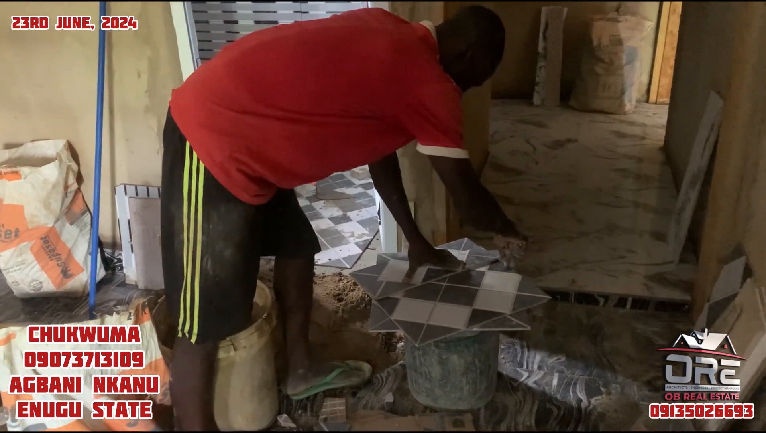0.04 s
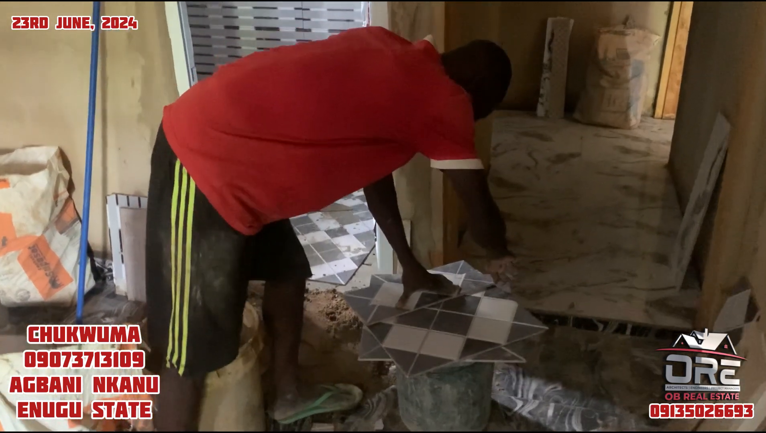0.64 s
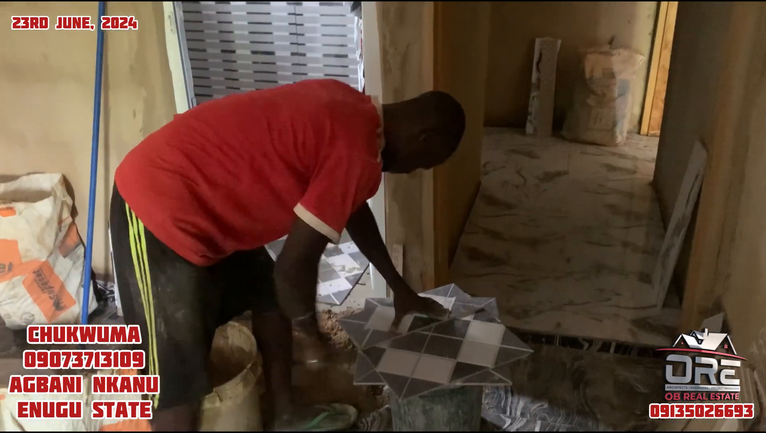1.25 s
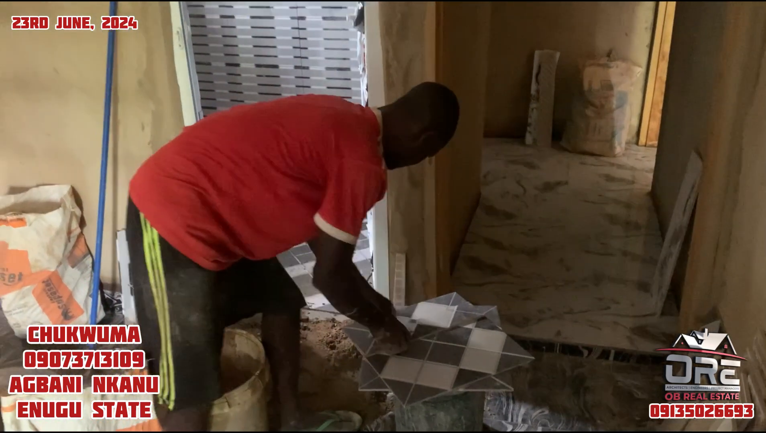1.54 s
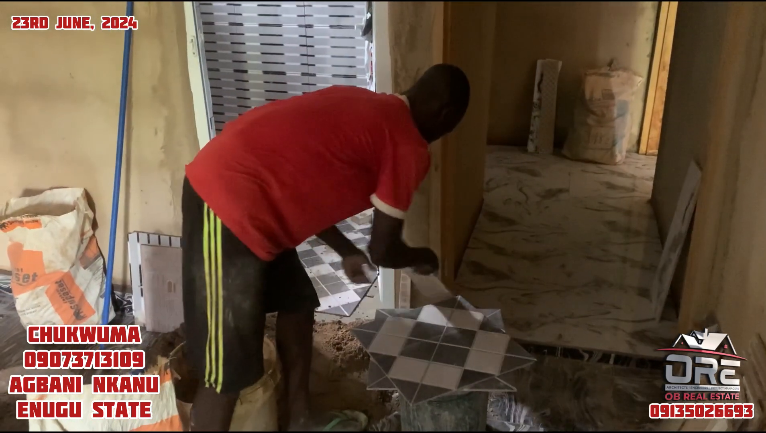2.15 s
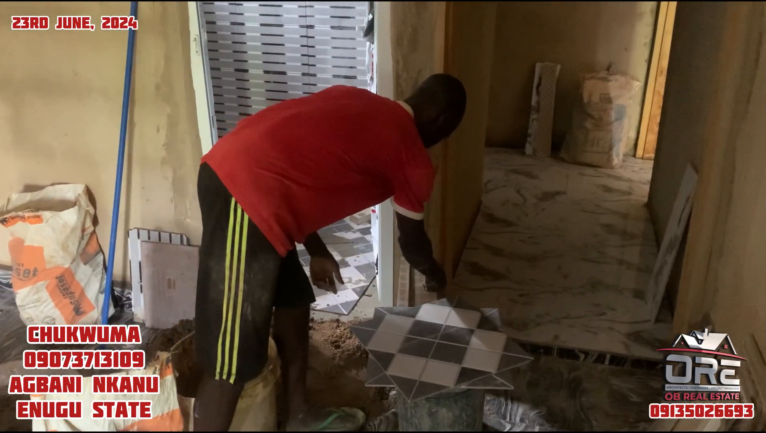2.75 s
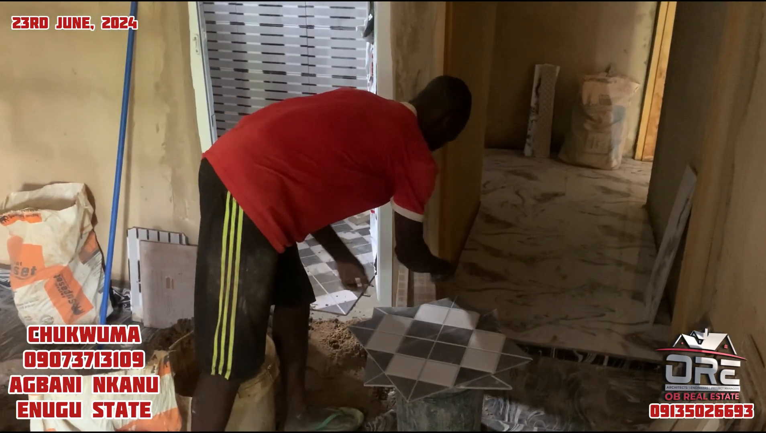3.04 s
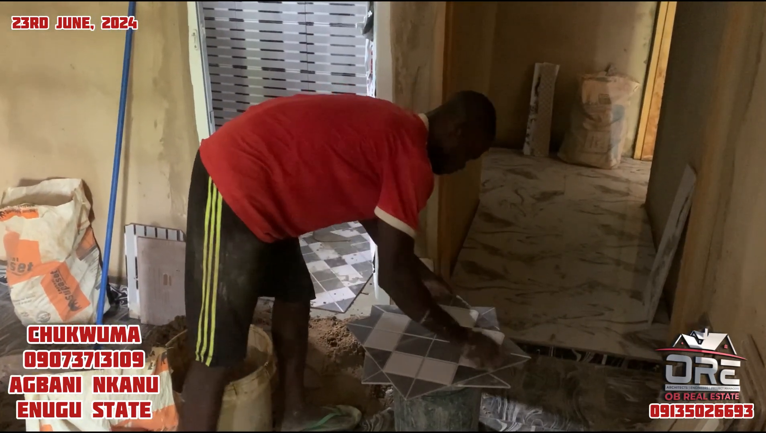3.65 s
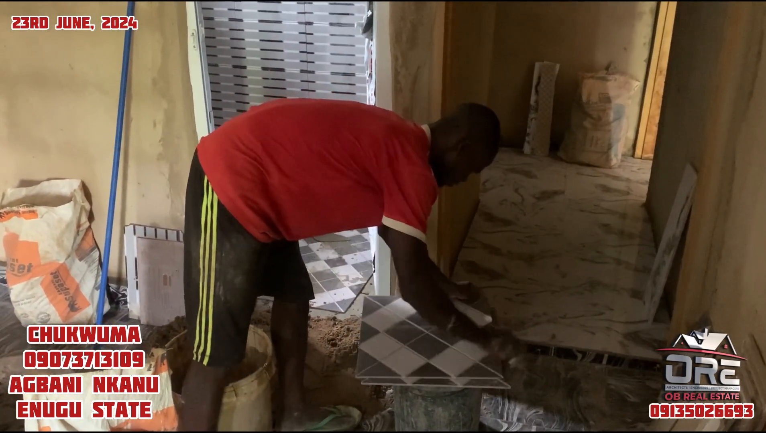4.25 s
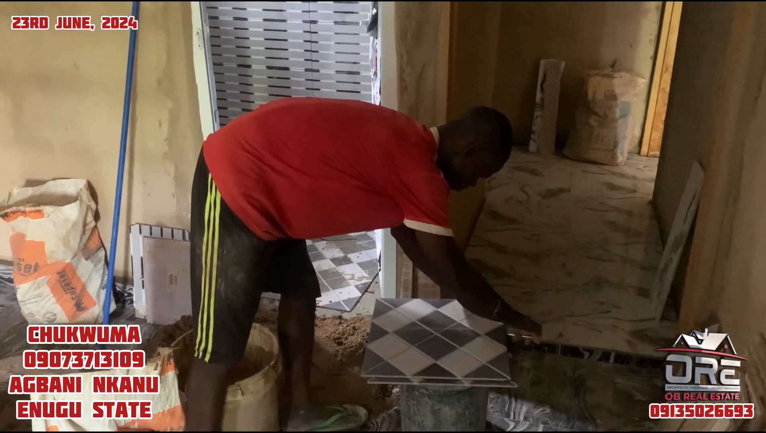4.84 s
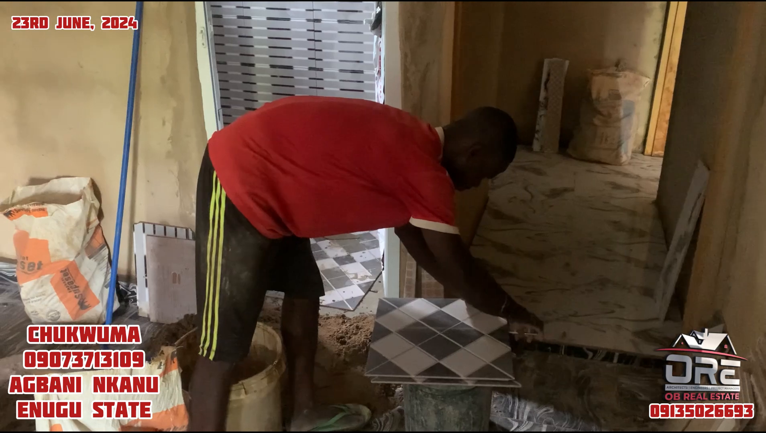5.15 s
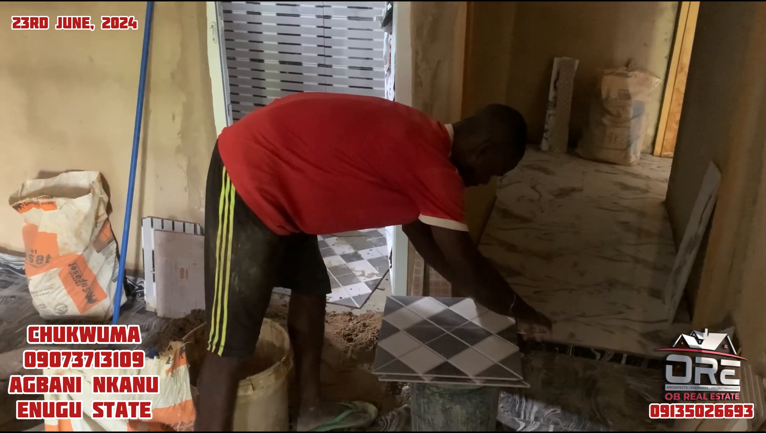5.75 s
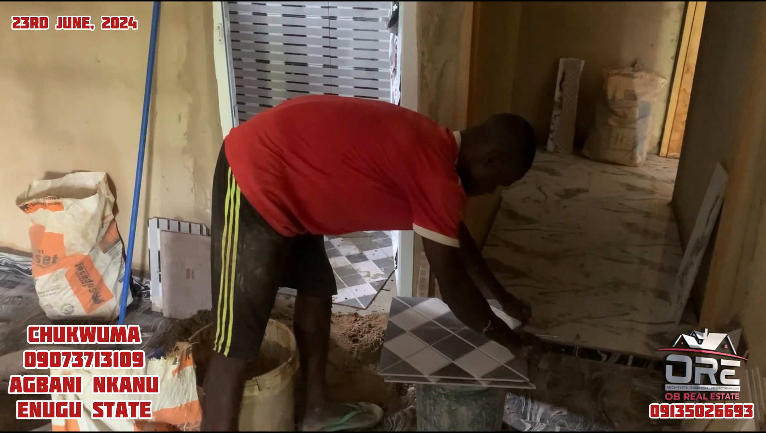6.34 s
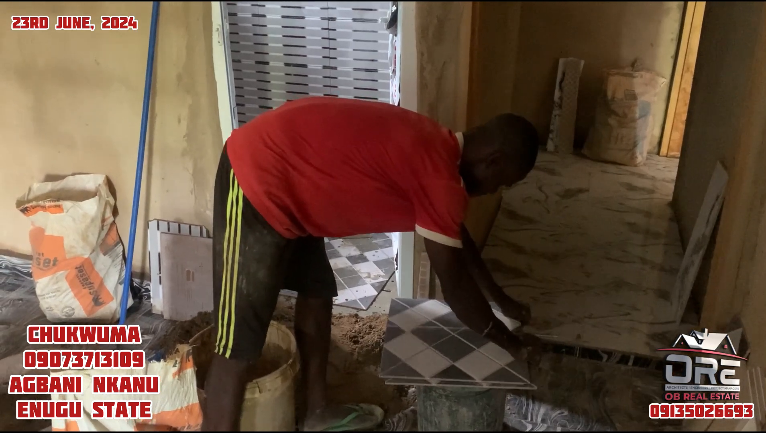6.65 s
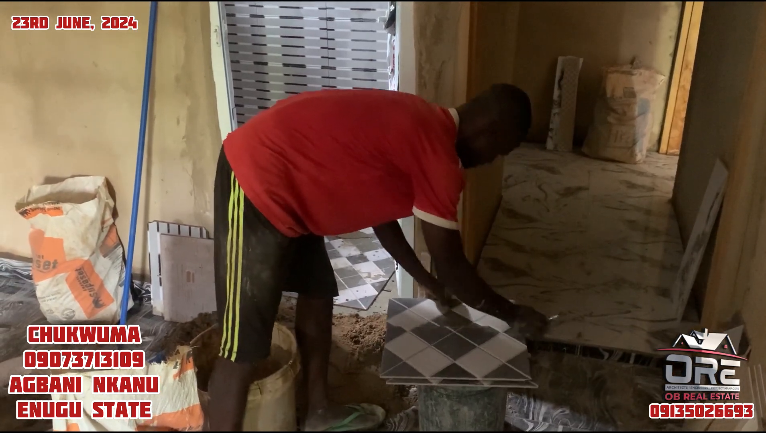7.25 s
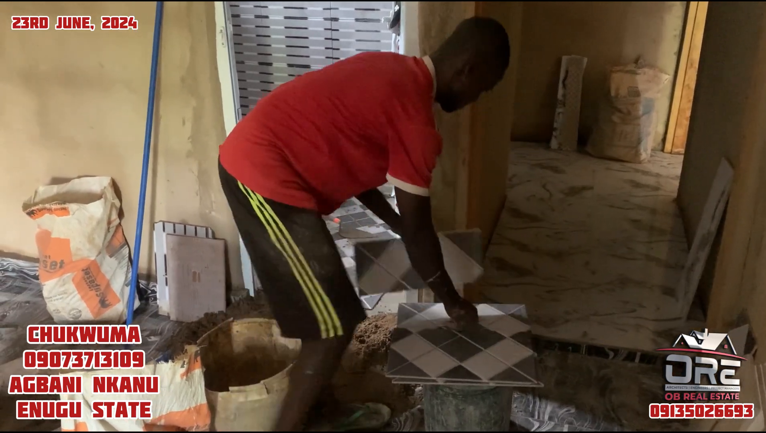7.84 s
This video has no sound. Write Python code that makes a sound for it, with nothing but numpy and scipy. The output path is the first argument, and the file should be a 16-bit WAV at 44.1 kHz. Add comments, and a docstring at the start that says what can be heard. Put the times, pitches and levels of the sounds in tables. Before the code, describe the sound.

Close to the microphone in a bare, echoing house, a steel trowel crunches into mortar and gives a sharp, gritty screech. Short scrapes and ringing blade taps follow, then more scraping and a run of crunchy knocks. Two hard thumps hit the slab, a ceramic tile slides briefly, and steel clinks on tile. Further off, plaster is rubbed in long strokes over a low outdoor rumble.

```python
"""In a bare, echoing house a tiler works mortar with a steel trowel. Sliding friction makes the blade
scrape through grit, and stick-slip makes it screech. Impacts crunch the mortar, thump the slab and
excite the free vibration of the blade and of a ceramic tile. Further off, plaster is rubbed in long
strokes over a low outdoor rumble. One short peep is heard. A phone close by limits the hardest blows."""
import sys
import numpy as np
from scipy import signal
from scipy.fft import rfft, irfft, next_fast_len
from scipy.io import wavfile
from scipy.ndimage import uniform_filter1d, map_coordinates

SR = 44100
rng = np.random.default_rng(int(sys.argv[2]) if len(sys.argv) > 2 else 0)


def transcribe(u):
    """Save the signal u as a 16-bit wav file named by the first command-line argument.

    u: samples, shape (n,) or (channels, n), limited to [-1, 1]; the rate is SR.
    q: integer samples, one column per channel.
    """
    v = np.clip(np.atleast_2d(u).T, -1, 1)
    q = np.round(v * 32767).astype(np.int16)
    wavfile.write(sys.argv[1], SR, q)


N = 353241
T = np.arange(N) / SR


def undb(db):
    """Decibels to amplitude ratio."""
    return 10 ** (np.asarray(db) / 20)


def unit(x):
    """Normalisation to rms 1."""
    return x / np.sqrt(np.mean(x ** 2))


def blow_level(x, db):
    """Equal energy: a transient gets the energy of 50 ms at this level."""
    return x * undb(db) * np.sqrt(SR / 20 / np.sum(x ** 2))


def on_log(hz, points):
    """Interpolation of (Hz, value) points over log frequency."""
    f, value = np.transpose(points)
    return np.interp(np.log(np.maximum(hz, 1)), np.log(f), value)


def colour(x, points, tilt_db=0):
    """Minimum-phase filtering by a spectrum, tilted per octave about 2 kHz."""
    size = 4096
    hz = np.arange(size // 2 + 1) * SR / size
    db = on_log(hz, points) + tilt_db * np.log2(np.maximum(hz, 500) / 2000)
    cepstrum = irfft(np.log(undb(db)))
    cepstrum[1:size // 2] *= 2
    cepstrum[size // 2 + 1:] = 0
    return signal.fftconvolve(x, irfft(np.exp(rfft(cepstrum))))[:len(x)]


def resonate(x, hz, width_hz):
    """Forced resonance: two like resonators in series, output at rms 1."""
    peak = signal.iirpeak(hz, hz / width_hz, fs=SR)
    return unit(signal.lfilter(*peak, signal.lfilter(*peak, x)))


def walk(rate, size):
    """Smooth random modulation with a spread near 1."""
    hold = int(SR / rate)
    held = np.repeat(rng.standard_normal(size // hold + 1), hold)
    return unit(uniform_filter1d(held, hold))[:size]


def grains(size, spread_db):
    """Granular noise: dense clicks, a few far above the rest."""
    return unit(rng.standard_normal(size) * undb(spread_db * np.minimum(rng.exponential(size=size), 6)))


def fade(t, t60):
    """Exponential decay, 60 dB in t60 seconds."""
    return np.exp(-np.log(1000) * t / max(t60, 1 / SR))


def burst(t60, rise_s):
    """Impact noise of the grains crushed by one blow."""
    t = T[:SR // 2]
    return grains(len(t), 1.8) * fade(t, t60) * (1 - fade(t, 2 * rise_s))


def ring(modes, split=0.0107, twin_db=-4, rattle=0.75, rattle_rate=350, size=SR):
    """Free vibration: each mode is a beating pair, roughened by loose grit."""
    t = T[:size]
    out = 0
    for hz, t60, db in modes:
        phase, twin_phase, detune = rng.uniform(-0.61, 1, 3)
        twin = undb(twin_db) * np.sin(2 * np.pi * (hz * (1 + split * detune) * t + twin_phase))
        jitter = rattle * walk(rattle_rate, len(t))
        out = out + undb(db) * fade(t, t60) * (np.sin(2 * np.pi * (hz * t + phase) + jitter) + twin)
    return out


def gesture(length_s, attack_s, release_t60, swell_db=0):
    """Time axis and amplitude envelope: attack, sloping hold, release."""
    t = T[:int((length_s + release_t60) * SR)]
    hold = undb(swell_db * (np.minimum(t / length_s, 1) - .5))
    return t, np.minimum(t / attack_s, 1) * hold * fade(np.maximum(t - length_s, 0), release_t60)


def add(track, s, x):
    """Superposition of a sound starting at time s, which may be negative."""
    start = int(s * SR)
    x, start = x[max(-start, 0):], max(start, 0)
    track[start:start + len(x)] += x[:N - start]


def flaring(events, modes, flutter_db, attack_s, release_t60, climb_db=0):
    """Noise-driven resonances flare at random; climb_db per octave favours high ones toward the end."""
    out = np.zeros(N)
    for s, length, db, swell_db in events:
        t, force = gesture(length, attack_s, release_t60, swell_db)
        drive = grains(SR, 2.5)
        tilt_db = climb_db * (np.minimum(t / length, 1) - .5)
        cry = 0
        for hz, width, mode_db in modes:
            flare = undb(mode_db + flutter_db * walk(74.9, SR)) * resonate(drive, hz, 2 * width)
            cry = cry + flare[-len(t):] * undb(tilt_db * np.log2(hz / 2000))
        add(out, s - length / 2, unit(cry) * force * undb(db))
    return out


# Likeness of left and right. Each row: frequency in Hz, coherence from 0 to 1.
COHERENCE = [(60, 1), (150, 0.92), (300, 0.62), (600, 0.42), (1200, 0), (15000, 0.07)]

def spread(pair):
    """Diffuse field: two unrelated signals become left and right, coherent in the bass."""
    size = pair.shape[1]
    padded = next_fast_len(size)
    alike = np.clip(on_log(np.arange(padded // 2 + 1) * SR / padded, COHERENCE), -1, 1)
    mid, side = rfft(pair, padded) * np.sqrt([(1 + alike) / 2, (1 - alike) / 2])
    return irfft(np.array([mid + side, mid - side]), padded)[:, :size]


# Outdoor noise. Each row: frequency in Hz, level in dB.
RUMBLE_SPECTRUM = [(20, -30.5), (45, -22.5), (62, 1), (95, 5.5), (140, 2.5), (270, -5), (420, 14.5),
                   (800, -4.5), (2500, 0.5), (6000, -65), (14000, -101)]

def outdoors(rumble_db=-46, drone_hz=61, drone_db=-50, overtone_db=-54):
    """Ambient noise: a low rumble and two wavering harmonics of a far engine."""
    rumble = spread(np.array([unit(colour(rng.standard_normal(N), RUMBLE_SPECTRUM)) for _ in range(2)]))
    phase = 2 * np.pi * np.cumsum(drone_hz * (1 + 0.0217 * walk(1.7, N))) / SR
    drone = undb(drone_db) * unit(np.sin(phase)) + undb(overtone_db) * unit(np.sin(2 * phase))
    return undb(rumble_db) * rumble + drone


# Strokes of the float. Each row: middle and length in seconds, rub and hiss levels in dB.
FLOAT_STROKES = [(0.055, 0.37, -30.5, -47), (0.383, 0.2, -30.5, -43), (1.213, 0.26, -27, -32),
                 (1.94, 0.69, -28, -36.5), (2.735, 0.28, -28, -44), (3.058, 0.25, -28, -38),
                 (3.31, 0.24, -28.5, -38), (4.093, 0.68, -28.5, -36.5), (4.861, 0.76, -25.5, -38),
                 (5.486, 0.43, -30, -42.5), (5.91, 0.45, -29, -34.5), (6.467, 0.26, -31, -38),
                 (6.99, 0.94, -27.5, -37), (7.59, 0.6, -30.5, -42)]
# The float catching. Each row: middle and length in seconds, level in dB.
FLOAT_RASPS = [(0.14, 0.58, -37.5), (1.297, 0.25, -29.5), (1.681, 0.071, -30), (1.716, 0.012, -20),
               (1.8, 0.094, -32), (2.267, 0.17, -26.5), (5.95, 0.39, -35), (7.046, 0.29, -30)]
# Rubbed plaster and its dry patches. Each row: frequency in Hz, level in dB.
RUB_SPECTRUM = [(30, -37.5), (70, -8), (135, 0.5), (210, -9.5), (270, 3), (400, -3.5), (750, -4.5),
                (1400, -3.5), (2500, -2.5), (4000, -13), (6000, -28.5), (9000, -58.5)]
HISS_SPECTRUM = [(1500, -11), (3200, 10), (4500, 6), (6800, -3.5), (8500, -26), (11500, -34),
                 (14000, -59.5)]

def plastering(grit_db=0.75, uneven_db=1.65, chatter_db=1.0, float_hz=1920, float_width_hz=290):
    """Friction noise, arriving diffusely: dry patches hiss and the float chatters in one resonance."""
    rub_power, hiss_power, rasp_power = np.zeros((3, N))
    for s, length, db, hiss_db in FLOAT_STROKES:
        _, speed = gesture(length, attack_s=0.11, release_t60=1)
        rasp_db = db - 13  # every stroke rasps a little
        for power, peak_db in (rub_power, db), (hiss_power, hiss_db), (rasp_power, rasp_db):
            add(power, s - length / 2, (speed * undb(peak_db)) ** 2)
    for s, length, db in FLOAT_RASPS:
        _, grip = gesture(length, attack_s=0.0055, release_t60=0.34)
        add(rasp_power, s - length / 2, (grip * undb(db)) ** 2)
    rub, hiss = (spread(np.array([unit(colour(grains(N, grit_db), tone)) for _ in range(2)]))
                 for tone in (RUB_SPECTRUM, HISS_SPECTRUM))
    rasp = np.array([resonate(grains(N, 0.54), float_hz, float_width_hz) for _ in range(2)])
    pressure = undb(uneven_db * walk(25, N))
    chatter = undb(chatter_db * walk(70, N))
    rubbing = rub * np.sqrt(rub_power) + hiss * np.sqrt(hiss_power)
    return pressure * rubbing + chatter * rasp * np.sqrt(rasp_power)


# The steel blade. Each row: frequency in Hz, t60 in seconds, levels in dB struck at heel and at tip.
BLADE_MODES = [(1086, .15, -19.5, -1), (1510, 0.45, -18.5, 2.5), (2235, 0.18, 3, -6.5),
               (2310, .18, -5, -17), (3125, 0.11, 1.5, 4.5), (3084, .14, -3.5, 3), (3450, 0.12, -6.5, -4),
               (3830, .12, -15.5, -2.5), (3888, .2, -15, 3.5), (4090, 0.13, 2, -1.5),
               (4370, 0.28, 3.5, -10.5), (4860, 0.16, -2, -5), (5420, 0.11, 2, -18), (5540, .22, -16, -18),
               (5862, 0.18, -17, -28), (5930, 0.13, 2, -22), (6400, 0.13, -4.5, -18.5),
               (6480, 0.48, -16, -17.5), (6920, 0.28, -7, -14), (7080, 0.27, -5.5, -20),
               (7910, 0.23, -9, -17.5), (10000, 0.14, -4.5, -21.5), (10050, .1, -9, -22),
               (10800, 0.15, -17, -28.5)]

def blade_modes(place, t60_share=1):
    """Mode shapes: the point of contact (0 heel, 1 tip) decides which modes speak."""
    return [(hz, t60 * t60_share, heel + place * (tip - heel)) for hz, t60, heel, tip in BLADE_MODES]


def flexed(x, depth=0.018, rate=30):
    """Frequency modulation: a pressed blade flexes, so its resonances wander together."""
    position = np.cumsum(1 + depth * walk(rate, SR))[:len(x)]
    return map_coordinates(x, [position], mode="mirror")


# Trowel strokes. Each row: middle and length in seconds, level and swell in dB,
# brightness in dB per octave, blade ring in dB, share of the length spent biting in.
TROWEL_STROKES = [(0.469, 0.14, -39.5, -7.5, -1.5, -0.5, 0.13), (0.85, 0.18, -12, -8.5, 2, -8, .3),
                  (1.687, 0.12, -36, -19, -1.5, -10, 0.22), (1.81, 0.098, -23.5, -4, -3.5, -2, 0.086),
                  (1.909, 0.12, -24.5, 6, -0.5, -3, 0.092), (3.93, 0.33, -24.5, 14, -0.5, -8.5, 0.12),
                  (4.131, 0.13, -16.5, 0, -3, -18, 0.39), (4.739, 0.35, -41, -12, -7, 5, 0.098),
                  (6.673, 0.12, -14, -4, -8, -26, 0.48), (7.324, 0.081, -16, -5.5, -2.5, -6.5, 0.17),
                  (7.593, .14, -21.5, 4, -2.5, -6, 0.55)]
# Scraped sand. Each row: frequency in Hz, level in dB.
GRIT_SPECTRUM = [(60, -24), (120, -2.5), (300, -8), (550, -5), (1200, -1), (2200, 2.5), (4200, -3.5),
                 (6800, -7), (8500, -25.5), (10000, -13.5), (12000, -16.5), (13100, -44), (16000, -51)]

def scrapes(grit_db=4.0, judder_db=3.3, judder_rate=70, pebble_rate=70, pebble_db=-7, contact_s=.003):
    """Forced vibration: dragged in small jerks, sand and pebbles drive the mortar-damped steel."""
    out = np.zeros(N)
    for s, length, db, swell_db, brightness, ring_db, bite in TROWEL_STROKES:
        steel = ring(blade_modes(place=rng.uniform(0, 1), t60_share=0.12), size=SR // 8)
        steel *= 1 - fade(T[:len(steel)], contact_s)
        t, force = gesture(length, bite * length, release_t60=0.16, swell_db=swell_db)
        pebbles = unit((rng.random(SR) < pebble_rate / SR) * rng.uniform(.5, 1, SR)) * undb(pebble_db)
        sand = (grains(SR, grit_db) * undb(judder_db * walk(judder_rate, SR)) + pebbles)[:len(t)]
        dull, sharp = (unit(colour(sand, GRIT_SPECTRUM, tilt)) for tilt in (-3, 3))
        tilt_db = brightness - 0.5 * (t / length - .5)  # duller as the blade sinks in
        sharpness = np.clip(tilt_db / 6 + .5, 0, 1)
        grit = unit((1 - sharpness) * dull + sharpness * sharp)
        blade = unit(flexed(signal.fftconvolve(sand, steel)[:len(t)])) * undb(ring_db)
        add(out, s - length / 2, (grit + blade) * force * undb(db))
    return out


# Blows into mortar. Each row: start in seconds, crunch in dB, t60 in seconds, cutoff in Hz, thud in dB.
MORTAR_BLOWS = [(.412, -39, 0.034, 14000, -69), (0.584, -36, 0.017, 10000, -60),
                (0.638, -29, 0.015, 8300, -58), (0.719, -24, 0.03, 5500, -31),
                (0.774, -15, 0.023, 4880, -23), (2.078, -28.5, 0.015, 2500, -58.5),
                (3.744, -39, 0.025, 4580, -38), (4.19, -24.5, 0.12, 1520, -34),
                (4.604, -26.5, 0.041, 5050, -45), (4.661, -17, 0.047, 3540, -28),
                (4.757, -22, 0.03, 4300, -24.5), (4.826, -16.5, 0.045, 4160, -23.5),
                (5.109, -29, 0.033, 4450, -24), (5.122, -22, 0.055, 3000, -35.5),
                (6.559, -16, 0.11, 5500, -27.5), (6.566, -5, 0.023, 8000, -17.5),
                (6.893, -27, 0.039, 1800, -27), (7.099, -32.5, 0.047, 2020, -32),
                (7.225, -13, 0.027, 4500, -36), (7.235, -6, 0.025, 6640, -16.5),
                (7.322, -17.5, 0.055, 4000, -22), (7.930, -20.5, 0.041, 6000, -54),
                (7.954, -13.5, 0.027, 8900, -45)]
# Lumps dropping off the blade. Each row: start in seconds, level in dB, t60 in seconds.
FALLING_LUMPS = [(2.437, -15.5, 0.013), (2.452, -24.5, 0.026), (2.48, -25, 0.071)]
# The three sounds of mortar. Each row: frequency in Hz, level in dB.
CRUNCH_SPECTRUM = [(80, -20.5), (200, 6), (400, 3.5), (750, 9), (1300, 5.5), (1800, 8), (2800, 8.5),
                   (4200, 5.5), (5500, -1), (8500, -6), (10500, -2.5), (11800, 7), (13200, -24.5),
                   (16000, -32)]
THUD_SPECTRUM = [(30, -39), (70, -20), (100, -10), (135, 1), (160, 1), (200, -5), (260, -5.5), (400, -13.5),
                 (900, -63.5)]
PLOP_SPECTRUM = [(70, -31), (220, -2), (450, 1), (880, 4), (1100, -4), (1400, -7), (4000, -28),
                 (12000, -46)]

def mortar(cushion_s=0.021, thud_t60=0.12):
    """Inelastic impact: blows crunch the sand and thud on the slab; lumps land with a wet plop."""
    out = np.zeros(N)
    for s, db, t60, top_hz, thud_db in MORTAR_BLOWS:
        rise_s = cushion_s * (4000 / top_hz) ** 2  # duller blows are cushioned longer
        cushion = signal.butter(3, top_hz, fs=SR)  # deep wet mortar absorbs the treble
        crunch = signal.lfilter(*cushion, colour(burst(t60, rise_s), CRUNCH_SPECTRUM))
        add(out, s, blow_level(crunch, db))
        add(out, s, blow_level(colour(burst(thud_t60, rise_s=0.011), THUD_SPECTRUM), thud_db))
    for s, db, t60 in FALLING_LUMPS:
        add(out, s, blow_level(colour(burst(t60, rise_s=0.001), PLOP_SPECTRUM), db))
    return out


# A short peep. Each row: middle and length in seconds, level and swell in dB.
PEEP_EVENTS = [(.607, .008, -20, 0)]
# Its resonance. Each row: frequency and width in Hz, level in dB.
PEEP_RESONANCE = [(1850, 30, 0)]

def peep():
    """Narrow resonance: a short, clear peep near 1.85 kHz."""
    return flaring(PEEP_EVENTS, PEEP_RESONANCE, flutter_db=-7.5, attack_s=0.0016, release_t60=0.0092)


# Thin whistles. Each row: middle and length in seconds, level, swell and third harmonic in dB.
EDGE_WHISTLES = [(.709, .005, -24, 0, -22), (.728, .016, -16, 0, -22), (.753, .03, -12, 0, -12),
                 (.835, .13, -17.5, -2, -14), (.925, .04, -21.5, -2, 0)]

def whistles(slip_hz=4992, waver=0.013, waver_rate=900, flutter_db=6.0):
    """Self-excited oscillation: the edge squeals at harmonics 2 and 3 of its unsteady slip rate."""
    out = np.zeros(N)
    for s, length, db, swell_db, third_db in EDGE_WHISTLES:
        t, force = gesture(length, attack_s=.003, release_t60=.05, swell_db=swell_db)
        phase = 2 * np.pi * np.cumsum(slip_hz * (1 + waver * walk(waver_rate, SR))) / SR
        squeal = np.sin(2 * phase) + undb(third_db) * np.sin(3 * phase)
        squeal *= undb(flutter_db * walk(150, SR))
        add(out, s - length / 2, unit(squeal[:len(t)]) * force * undb(db))
    return out


# The edge catching. Each row: start in seconds, level in dB, pitch in Hz, t60 in seconds.
PEBBLE_CATCHES = [(0.720, -24, 1280, .05), (1.936, -25, 3740, 0.098), (4.604, -17.5, 3560, 0.11),
                  (4.758, -24, 1610, .04), (4.833, -18.5, 2720, 0.054), (5.122, -31, 2860, .04)]
# Resonances of a catch. Each row: multiple of the pitch, width in Hz, level in dB.
CATCH_MODES = [(1, 130, 2.5), (1.11, 150, -8), (1.87, 250, -11)]

def chinks():
    """Sudden release: a pebble snaps from under the edge; the free length of steel sets the pitch."""
    out = np.zeros(N)
    for s, db, pitch_hz, t60 in PEBBLE_CATCHES:
        snap = burst(t60, rise_s=0.0033)
        tone = sum(undb(mode_db) * resonate(snap, pitch_hz * ratio, 2 * width)
                   for ratio, width, mode_db in CATCH_MODES)
        add(out, s, blow_level(tone, db))
    return out


# The blade on stone. Each row: middle and length in seconds, level and swell in dB.
STONE_STROKES = [(.765, .045, -12.5, 3), (.825, .07, -9.5, 0), (.9, .08, -14, -3), (4.145, .08, -21, 2)]
# The screeching blade. Each row: frequency and width in Hz, level in dB.
EDGE_MODES = [(830, 70, -3), (1130, 120, -1), (1340, 100, 3), (2100, 120, -8), (2680, 200, -.5),
              (3020, 200, 2), (3500, 160, 0), (4400, 220, -2), (5600, 220, -6)]

def screech():
    """Stick-slip on stone drives the resonances of the hard-pressed blade."""
    return flaring(STONE_STROKES, EDGE_MODES, flutter_db=5, attack_s=0.0049, release_t60=.07, climb_db=4)


# Knocks that clean the trowel. Each row: start in seconds, ring and tick in dB, place (0 heel, 1 tip).
TROWEL_KNOCKS = [(1.756, -20, -24, 0.44), (1.858, -23.5, -35, 0.25), (1.899, -21, -38, 0.65),
                 (2.435, -18, -26, 0.021), (2.660, -15, -28, 0.85)]

def trowel_knocks(contact_s=0.013):
    """Impact excitation: the blade rings freely, while grit ticks and softens the contact."""
    out = np.zeros(N)
    onset = 1 - fade(T[:SR], contact_s)
    for s, ring_db, tick_db, place in TROWEL_KNOCKS:
        add(out, s, blow_level(onset * ring(blade_modes(place)), ring_db))
        tick = colour(burst(t60=0.03, rise_s=0.0017), CRUNCH_SPECTRUM, tilt_db=-3.5)
        add(out, s, blow_level(tick, tick_db))
    return out


# Smearing as a stroke ends. Each row: middle and length in seconds, level and swell in dB.
BED_SMEARS = [(4.218, .06, -27.5, -5)]
# Its hollow resonances. Each row: frequency and width in Hz, level in dB.
HOLLOW_MODES = [(583, 120, 0), (820, 140, 0), (1300, 200, 3)]

def smear():
    """Sliding friction: the flat of the blade rubs hollowly on the mortar bed."""
    return flaring(BED_SMEARS, HOLLOW_MODES, flutter_db=3.5, attack_s=0.016, release_t60=.08)


# Blows that reach the slab. Each row: start in seconds, knock and thump in dB, thump pitch in Hz.
SLAB_BLOWS = [(4.667, -17, -24, 153), (4.760, -29, -28, 253), (4.833, -26, -22.5, 228),
              (6.567, -17, -8, 148), (7.237, -8, -15, 198), (7.255, -11, -15, 152)]
# Steel on the slab. Each row: frequency in Hz, t60 in seconds, level in dB.
SLAB_MODES = [(522, 0.15, -2.5), (727, 0.075, -5.5), (850, 0.1, -2.5), (929, .07, -11), (1200, 0.07, -22),
              (1300, .07, 10), (1374, 0.085, 12.5), (1465, 0.034, 6.5)]

def slab(contact_s=0.011, thump_t60=0.087, thump_rise_s=0.12, thump_lag_s=0.0047):
    """Damped vibration of the slab: a solid knock, then a low thump, returned apart."""
    knocks, thumps = np.zeros((2, N))
    t = T[:SR]
    for s, knock_db, thump_db, thump_hz in SLAB_BLOWS:
        add(knocks, s, blow_level(ring(SLAB_MODES) * (1 - fade(t, contact_s)), knock_db))
        thump = np.sin(2 * np.pi * thump_hz * t) * fade(t, thump_t60) * (1 - fade(t, thump_rise_s))
        add(thumps, s + thump_lag_s, blow_level(thump, thump_db))
    return knocks, thumps


# A tile being dragged. Each row: middle and length in seconds, level and swell in dB.
TILE_DRAGS = [(7.628, .07, -18, -4)]
# Its resonances. Each row: frequency and width in Hz, level in dB.
DRAG_MODES = [(861, 32, 9.5), (1360, 50, 7.5), (2160, 35, 2), (2990, 90, 4), (3330, 30, 3), (3710, 45, -2),
              (4590, 45, -1), (5350, 250, -4)]

def tile_slide():
    """Stick-slip drives the resonances of a tile pulled off the stack."""
    return flaring(TILE_DRAGS, DRAG_MODES, flutter_db=4, attack_s=0.016, release_t60=0.11)


# Steel on tile. Each row: start in seconds, level in dB.
TILE_TAPS = [(7.929, -18.5), (7.956, -8)]
# The struck tile. Each row: frequency in Hz, t60 in seconds, level in dB.
TILE_MODES = [(1676, 0.065, -4.5), (2700, 0.077, -7), (3170, 0.09, 3.5), (3960, .1, -9), (4170, 0.086, 8.5),
              (4200, 0.07, 0), (4360, 0.072, 8.5), (4565, 0.073, -3), (4900, 0.1, -3.5), (5460, 0.13, -4),
              (5570, 0.12, -18), (6050, 0.16, -4.5), (6590, 0.13, -4), (6900, 0.11, 0), (8020, 0.09, -10),
              (9835, 0.027, -3.5)]

def tile_clinks():
    """Free vibration of a plate: the struck ceramic rings briefly."""
    out = np.zeros(N)
    for s, db in TILE_TAPS:
        add(out, s, blow_level(ring(TILE_MODES), db))
    return out


# Bare walls and concrete floor. Each row: frequency in Hz, t60 in seconds.
REVERB_TIMES = [(60, 0.45), (125, .75), (250, 0.55), (600, 0.66), (1500, 0.52), (4000, 0.6), (8000, 0.45),
                (15000, 0.3)]

def room_echo(first_wall_s=0.00048, standing_hz=124, standing_t60=1.8, standing_db=-39):
    """Reverberation: each octave decays at its own rate; a standing wave between the walls booms on."""
    t = T[:2 * SR]
    noise = rfft(spread(rng.standard_normal((2, len(t)))))
    hz = np.arange(noise.shape[1]) / 2
    octave = np.log2(np.maximum(hz, 62.5) / 62.5)
    echo = undb(standing_db) * fade(t, standing_t60) * np.sin(2 * np.pi * standing_hz * t)
    for k in range(10):
        band = irfft(noise * np.maximum(1 - abs(octave - k), 0))
        echo = echo + band * fade(t, on_log(62.5 * 2 ** k, REVERB_TIMES))
    echo *= np.clip(t / first_wall_s - 1, 0, 1)
    return echo / np.sqrt(SR * on_log(2000, REVERB_TIMES) / np.log(10 ** 6))  # energy near 1


def in_room(x, echo, direct_db, echo_db, left_lag_s=.00004):
    """Direct plus reverberant field; the direct sound reaches the left a little late."""
    delay = np.sinc(np.arange(-16, 17) - left_lag_s * SR) * np.hanning(33)
    direct = np.array([np.convolve(x, delay, "same"), x])
    return undb(direct_db) * direct + undb(echo_db) * signal.fftconvolve(x[None], echo, axes=1)[:, :N]


def scene():
    """Superposition of the tiler close by and the rest of the site behind."""
    echo = room_echo()
    screeching, sliding, peeping, smearing = screech(), tile_slide(), peep(), smear()
    strokes = in_room(scrapes() + screeching + sliding + smearing, echo, direct_db=-2.5, echo_db=-0.5)
    edge = in_room(whistles(), echo, direct_db=-6.5, echo_db=-3.5, left_lag_s=.000025)
    blows = in_room(mortar(), echo, direct_db=-8.0, echo_db=1)
    rings = in_room(trowel_knocks() + tile_clinks(), echo, direct_db=-7.0, echo_db=-1.5)
    snaps = in_room(chinks() + peeping, echo, direct_db=-4.5, echo_db=-6)
    knocks, thumps = slab()
    ground = in_room(knocks, echo, direct_db=-7.5, echo_db=-5)
    ground += in_room(thumps, echo, direct_db=-5.5, echo_db=-7)
    return strokes + edge + blows + ground + rings + snaps + plastering() + outdoors()


def record(dry, ceiling_db=-4, release_db_per_s=45, attack_s=0.062):
    """Automatic gain control: peaks clip before the gain falls; it recovers slowly. The top is cut."""
    peak_db = 20 * np.log10(uniform_filter1d(np.abs(dry).max(axis=0), size=32) + 1e-9)
    recovery_db = release_db_per_s * T
    held_db = np.maximum.accumulate(peak_db + recovery_db) - recovery_db
    excess_db = np.maximum(held_db - ceiling_db, 0)
    step = 1 / (attack_s * SR)
    reduction_db = signal.lfilter([step], [1, step - 1], excess_db)
    limited = np.clip(dry * undb(-reduction_db), -1, 1)
    return signal.sosfilt(signal.ellip(8, .2, 70, 15900, fs=SR, output="sos"), limited)


dry = scene()
out = record(dry)
transcribe(out)
```